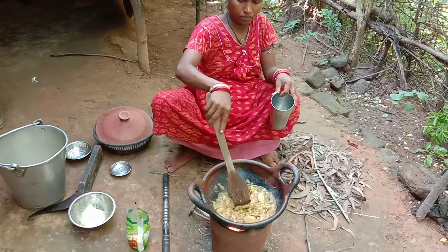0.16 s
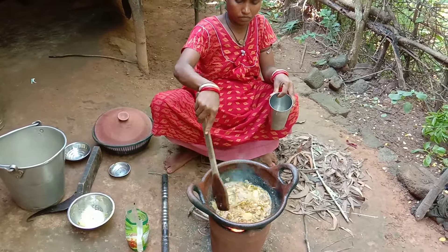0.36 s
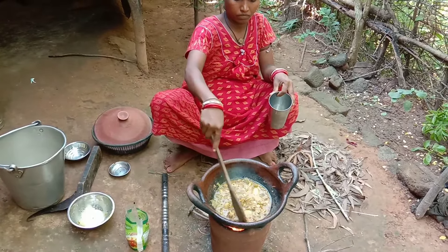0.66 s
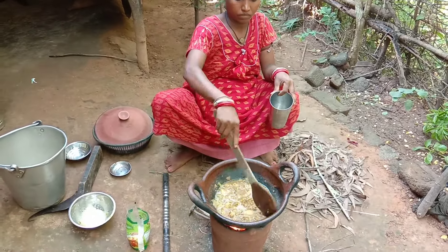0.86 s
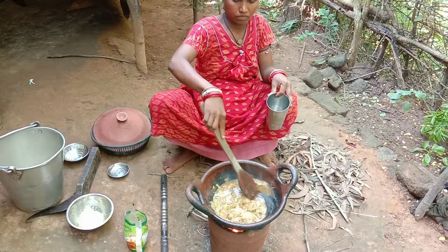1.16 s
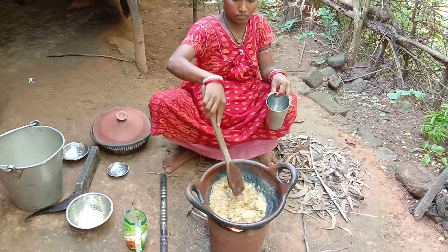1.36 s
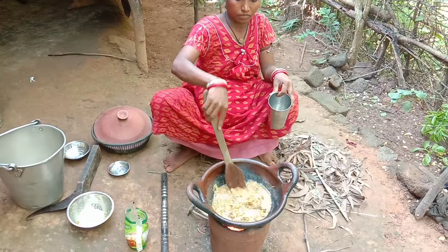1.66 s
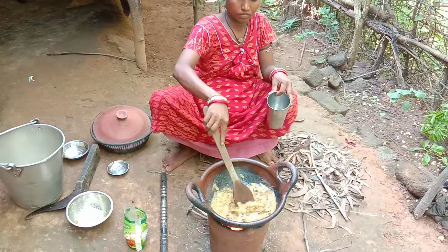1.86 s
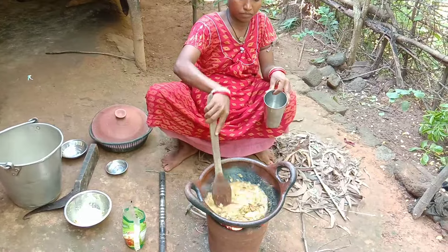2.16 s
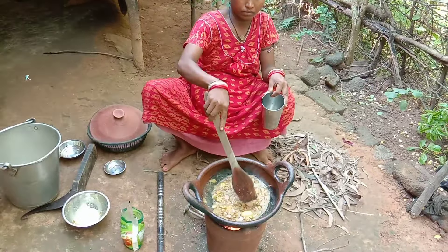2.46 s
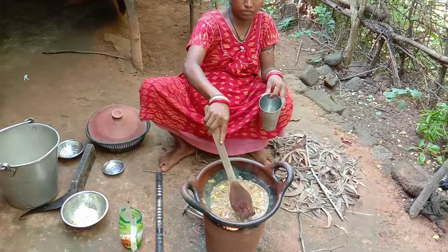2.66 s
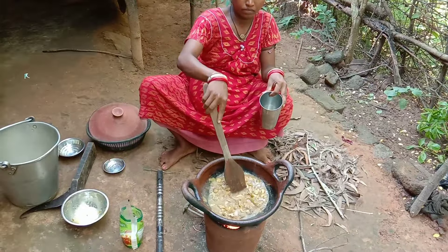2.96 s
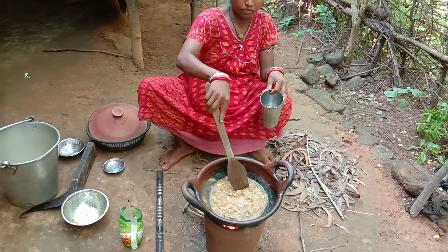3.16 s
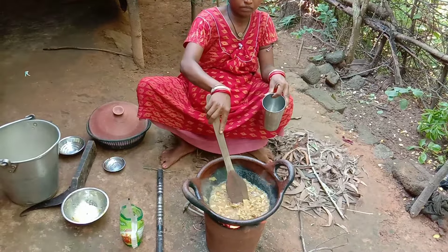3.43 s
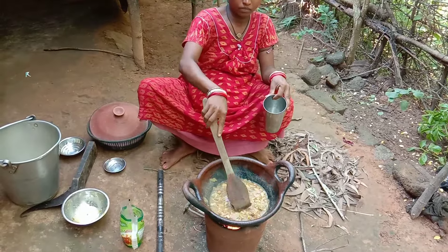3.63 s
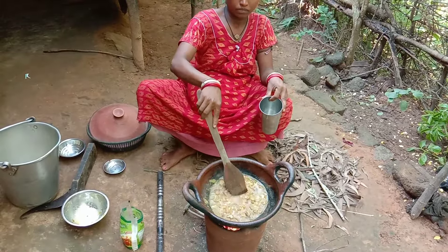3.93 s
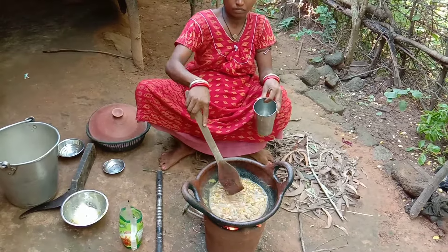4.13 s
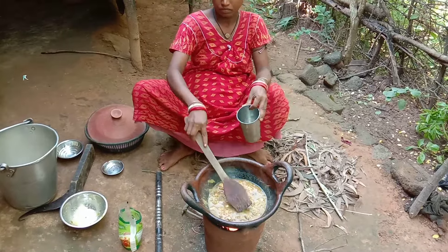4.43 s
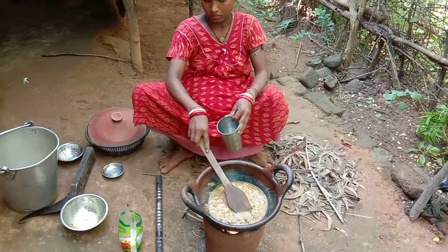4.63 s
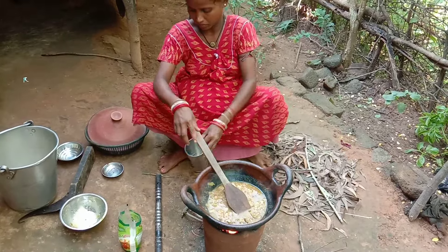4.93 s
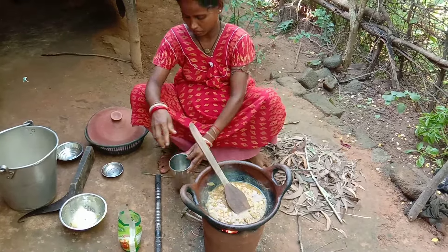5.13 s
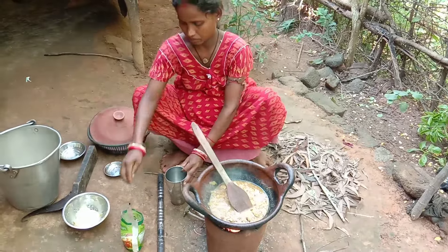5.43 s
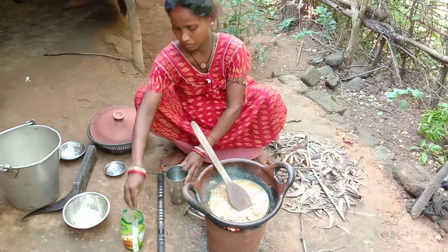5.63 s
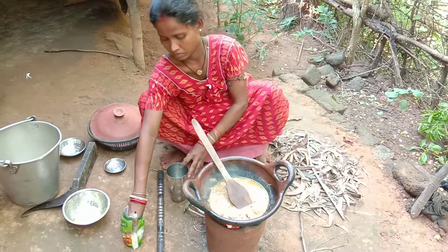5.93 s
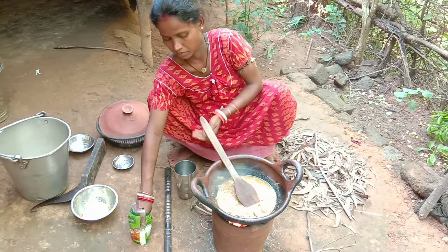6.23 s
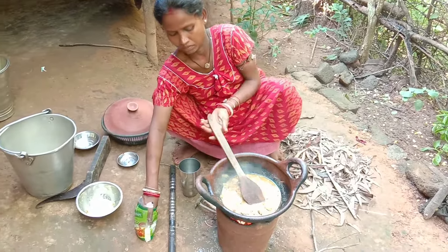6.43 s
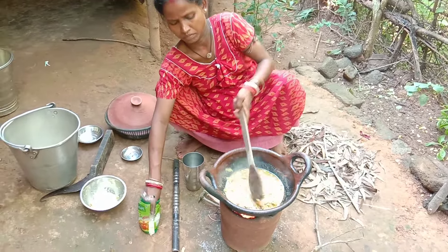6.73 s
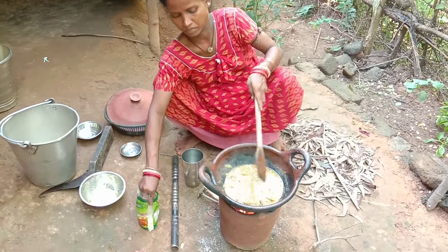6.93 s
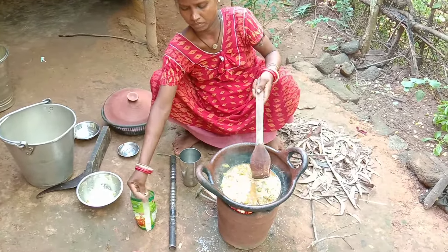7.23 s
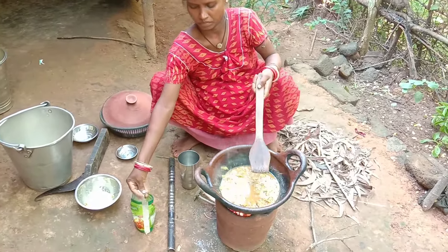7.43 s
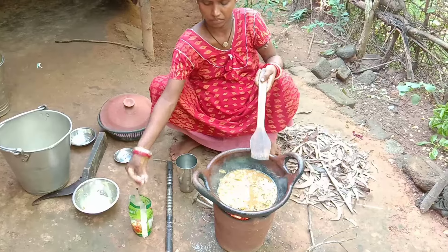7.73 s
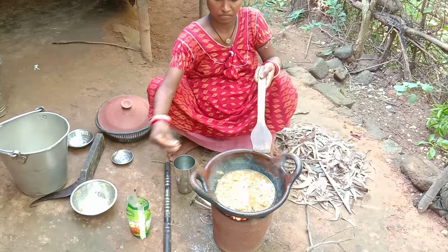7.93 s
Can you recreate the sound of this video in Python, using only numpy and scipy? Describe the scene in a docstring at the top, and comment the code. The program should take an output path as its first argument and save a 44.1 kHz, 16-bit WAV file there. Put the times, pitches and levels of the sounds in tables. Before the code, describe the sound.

Gritty wooden scraping and hollow knocks on an earthen cooking pot, with quavering goat bleats, distant answering cries and faint bird notes outdoors.

```python
"""Still air and a low drone come first, and almost at once a wooden spatula scrapes and knocks a clay pot.
It stirs food over a small fire in a village yard: gritty slips rasp, resonances sing and blows ring.
Goats bleat near and far, as pulses and hiss shaped by throat resonances.
Bangles clink on the cook's wrist as short high rings, and faint gliding notes are birds in the trees."""
import sys
import numpy as np
from scipy import signal
from scipy.fft import rfft, irfft, next_fast_len
from scipy.io import wavfile
from scipy.ndimage import uniform_filter1d

SR = 44100
rng = np.random.default_rng(int(sys.argv[2]) if len(sys.argv) > 2 else 0)


def bounce(signal):
    """Save signal as a 16-bit WAV file at the path given by the first command-line argument."""
    frames = np.transpose(np.atleast_2d(signal))
    limited = np.clip(frames, -1, 1)
    pcm = np.round(limited * 32767).astype(np.int16)
    wavfile.write(sys.argv[1], SR, pcm)


N = 356351
T = np.arange(N) / SR  # time in seconds
HZ = np.fft.rfftfreq(4096, 1 / SR)  # frequencies at which every filter is drawn


def amp(db):
    """Decibels to gain."""
    return 10 ** (np.asarray(db) / 20)


def unit(x):
    """Scales to rms 1."""
    return x / np.sqrt(np.mean(x ** 2) + 1e-20)


def read(points, hz):
    """Reads a spectrum on a log-frequency axis."""
    f, value = np.transpose(points)
    return np.interp(np.log(hz + 1), np.log(f + 1), value)


def tilt(db_per_octave):
    """Gain that changes by the same number of decibels in each octave."""
    return amp(db_per_octave * np.log2(HZ + 1))


def level(rows, axis=1, fade_db=600):
    """Gain from one dB column of a curve, fading by fade_db a second outside it."""
    rows = np.array(rows)
    outside_s = abs(T - np.clip(T, rows[0, 0], rows[-1, 0]))
    return amp(np.interp(T, rows[:, 0], rows[:, axis]) - np.minimum(fade_db * outside_s, 200))


def add(mix, s, sound):
    """Mixes a sound in at time s."""
    part = mix[max(round(s * SR), 0):][:len(sound)]
    part += sound[:len(part)]


def hold(t, length, attack_s, release_s):
    """Smooth attack, hold and release."""
    attack = np.sin(np.pi / 2 * np.clip(t / attack_s, 0, 1)) ** 2
    release = np.sin(np.pi / 2 * np.clip((length - t) / release_s, 0, 1)) ** 2
    return attack * release


def wander(hz, count=N):
    """Slow random motion of rms 1, mostly below the rate hz."""
    padded = next_fast_len(count)
    spectrum = rfft(rng.standard_normal(padded))
    smooth = np.exp(-(np.fft.rfftfreq(padded, 1 / SR) / hz) ** 2)
    return unit(irfft(spectrum * smooth, padded)[:count])


def resonances(modes):
    """Gain over frequency of a few steep-sided resonances, with the deep bass taken away."""
    peaks = sum(amp(db) / (1 + ((HZ - hz) / width) ** 2) for hz, width, db in modes)
    return peaks * HZ ** 2 / (HZ ** 2 + (modes[0][0] / 2) ** 2)


def shifted(gain, spread):
    """The same filter moved up or down in pitch by a random share."""
    return np.interp(HZ * (1 + spread * rng.standard_normal()), HZ, gain)


def colour(x, gain):
    """Causal filter with the given gain over frequency."""
    log_gain = np.log(np.maximum(np.r_[gain, gain[-2:0:-1]], 1e-5 * gain.max()))
    taps = np.fft.ifft(np.exp(np.conj(signal.hilbert(log_gain)))).real
    return signal.oaconvolve(x, taps)[:len(x)]


def grains(per_s, spread_db):
    """Random clicks, a few much larger than the rest."""
    clicks = rng.choice([-1, 1], N) * (rng.random(N) < per_s / SR)
    sizes = amp(spread_db * np.minimum(rng.exponential(1, N), 4))
    return unit(clicks * sizes)


def ring(modes, scatter_db):
    """Dying modes; every blow lands on another spot and weights them anew."""
    t = np.arange(SR // 4) / SR
    out = np.zeros(len(t))
    for k, (hz, db, t60) in enumerate(modes):
        decay = amp(db + scatter_db * rng.standard_normal() - 60 * t / t60)
        out += (-1) ** k * decay * np.sin(2 * np.pi * hz * t)
    return out


def glides(rows, buzz, rate_hz):
    """Short swelling tones that slide in pitch and flutter by the share buzz, mostly below rate_hz."""
    out = np.zeros(N)
    for s, length, start_hz, end_hz, db in rows:
        hz = np.geomspace(start_hz, end_hz, int(length * SR))
        hz = hz * (1 + buzz * wander(rate_hz, len(hz)))
        tone = np.sqrt(2) * np.sin(2 * np.pi * np.cumsum(hz) / SR)
        add(out, s, amp(db) * np.hanning(len(hz)) * tone)
    return out


def folds(hz, rough, jitter, half=1):
    """Vocal folds: uneven pulses, odd harmonics weighted by half, with a hissing puff in every cycle."""
    turns = np.cumsum(hz * (1 + jitter * wander(160, len(hz)))) / SR
    pulses = np.zeros(len(hz))
    for k in range(1, int(9000 / hz.mean())):
        pulses += (half if k % 2 else 1) * np.cos(2 * np.pi * k * turns)
    puffs = (2.0 + np.exp(-(turns % 1) / 0.71)) * rng.standard_normal(len(hz))
    hiss = signal.lfilter(*signal.butter(1, 2000, "high", fs=SR), puffs)
    rough = np.clip(rough, 0, 1)
    shimmer = amp(6 * rough * wander(110, len(hz)))
    return shimmer * (np.sqrt(1 - rough) * unit(pulses) + np.sqrt(rough) * unit(hiss))


def steadied(voice):
    """Holds a voice near rms 1 while its harmonics slide through the resonances."""
    recent_power = abs(uniform_filter1d(unit(voice) ** 2, size=2000))
    return voice / np.sqrt(recent_power + 1e-4) / np.sqrt(np.mean(voice ** 2))


# how long echoes last in the yard: pitch_hz, time to fall 60 dB t60_s
YARD_DECAY = [(200, .3), (1000, .24), (4000, .32), (12000, .16)]


def yard(x, wet_db):
    """Scattered echoes from mud walls and trees, the highest treble dying fastest."""
    t = np.arange(SR // 2) / SR
    taps = rng.standard_normal(len(t)) * (rng.random(len(t)) < 2500 / SR) * (t > .004)
    hz, s, z = signal.stft(taps, SR, nperseg=256)
    tail = signal.istft(z * amp(-60 * s / read(YARD_DECAY, hz)[:, None]), SR, nperseg=256)[1]
    echoes = signal.fftconvolve(x, tail / np.linalg.norm(tail))[:N]
    return (x + amp(wet_db) * echoes) / np.sqrt(1 + amp(2 * wet_db))


# colour of the still air: pitch_hz, relative density_db
AIR_COLOUR = [(25, -19), (45, -20), (100, -20), (220, -10.5), (400, -13), (540, -10.5), (715, -8),
              (950, -19), (1270, -8.5), (1500, -16), (3000, -19.5), (5500, -22.5), (8200, -30.5),
              (10300, -31), (12500, -33.5), (15700, -26)]


def still_air():
    """Random noise shaped to the colour of the air, at rms 1."""
    return unit(colour(rng.standard_normal(N), amp(read(AIR_COLOUR, HZ))))


# resonances of the low drone: pitch_hz, width_hz, relative level_db
DRONE_MODES = [(59.5, 7.7, -10.5), (88.9, 6.3, 4.5), (122.3, 11, -7), (164, 86, -11)]
# strength of the drone over time, before its waver: time_s, level_db
DRONE_CURVE = [(0, -67), (1.4, -63.5), (1.7, -67.5), (1.9, -56.5), (2.8, -59.5), (3.9, -65), (5.5, -63.5),
               (8.08, -64.5)]
# resonance of the thin high hiss: pitch_hz, width_hz, relative level_db
HISS_MODES = [(10730, 230, 0)]
AIR_DB, AIR_SWELL_DB, AIR_SWELL_HZ = -68.5, 1.2, 3.5
DRONE_WAVER_DB, DRONE_WAVER_HZ = 3, 9
HISS_DB = -76.5


def background():
    """Still air, a low wavering drone and a thin high hiss, all made of filtered noise."""
    air = still_air() * amp(AIR_DB + AIR_SWELL_DB * wander(AIR_SWELL_HZ))
    drone = unit(colour(rng.standard_normal(N), resonances(DRONE_MODES))) * level(DRONE_CURVE)
    drone = drone * amp(DRONE_WAVER_DB * wander(DRONE_WAVER_HZ))
    hiss = amp(HISS_DB) * unit(colour(rng.standard_normal(N), resonances(HISS_MODES)))
    return air + drone + hiss


# bird notes: start_s, length_s, start_pitch_hz, end_pitch_hz, level_db
BIRD_NOTES = [(0, 0.35, 602, 574, -66), (3.12, 0.19, 5360, 4673, -66), (3.18, 0.09, 3950, 3600, -61),
              (3.305, 0.075, 4100, 3600, -60), (3.3, .16, 5500, 4600, -67), (3.48, 0.14, 6000, 4200, -61),
              (3.55, 0.09, 4300, 3400, -63), (3.6, .14, 5500, 4700, -67), (3.715, 0.08, 4650, 3900, -68),
              (3.775, 0.07, 5350, 5300, -67), (3.86, .16, 5400, 4900, -70), (3.95, .1, 4100, 3600, -68),
              (4.542, .08, 5700, 4730, -68), (4.78, 0.1, 5300, 4530, -68), (5.036, .14, 6570, 4870, -71),
              (8.02, 0.11, 3890, 3590, -58)]


def birds():
    """Faint gliding notes that echo among the trees."""
    return yard(glides(BIRD_NOTES, buzz=0.045, rate_hz=294), wet_db=6)


# clear far cries: start_s, length_s, pitch_hz, start above that pitch (share), final drop (share),
# waver (share), level_db, middle swell_db, then relative level_db of harmonics 1, 2 and 3
CLEAR_CALLS = [(3.25, .6, 492, .085, .025, .007, -62, 6, -14, 0, -19),
               (3.755, .1, 770, -.03, -.01, .028, -52.5, 5, 0, -22, -19)]
SETTLE_S = .055  # a clear cry slides onto its note
CLEAR_WAVER_DB, CLEAR_WAVER_HZ = 2.5, 14  # its strength wavers on the way


def clear_cries():
    """Thin, nearly pure calls from far off: three harmonics slide onto a note and swell."""
    out = np.zeros(N)
    for s, length, hz, scoop, drop, waver, db, swell_db, *harmonics_db in CLEAR_CALLS:
        t = np.arange(int(length * SR)) / SR
        glide = 1 + scoop * np.exp(-t / SETTLE_S) - drop * (t / length) ** 2
        pitch = hz * glide * (1 + waver * wander(60, len(t)))
        turns = np.cumsum(pitch) / SR
        tone = sum(amp(part_db) * np.sin(2 * np.pi * k * turns)
                   for k, part_db in enumerate(harmonics_db, 1))
        swell = swell_db * np.sin(np.pi * t / length)
        effort = amp(db + swell + CLEAR_WAVER_DB * wander(CLEAR_WAVER_HZ, len(t)))
        add(out, s, effort * unit(tone) * hold(t, length, .015, .03))
    return yard(out, wet_db=-7)


# far bleats: start_s, length_s, starting pitch_hz, final drop (share), level_db before FAR_DB,
# swell_db from start to end, roughness (0-1), brightness (dB an octave from 1 to 2 kHz)
FAR_BLEATS = [(4.02, .24, 468, .04, -54.5, -4, .3, 3), (4.09, .17, 415, .06, -55, 0, .45, -4),
              (4.235, .41, 490, .17, -50.5, -3, .13, 1), (4.43, .22, 420, .03, -54.5, -6, .35, 12),
              (4.67, .3, 478, 0, -54, -2, .28, 12), (4.9, .19, 432, 0, -50.5, -3, .14, 11),
              (4.99, .38, 478, 0, -53, 0, .4, 13), (5.05, .32, 428, .3, -50, 0, .25, 8),
              (5.59, 0.23, 358, 0.022, -57.5, 8, 0.15, 6)]
# throat of the far goats: pitch_hz, width_hz, relative level_db
FAR_THROAT_MODES = [(470, 120, -48), (740, 52, 12), (922, 60, 10), (1270, 37, -8), (1705, 98, 1),
                    (1865, 65, 5.5), (2586, 53, -9.5), (2786, 53, -8), (3120, 72, -21.5), (3570, 113, -16)]
FAR_DB = -0.5  # the far goats together
FAR_SAG_PER_S, FAR_DROP_POWER = .12, 2.4  # the pitch sinks steadily, then gives way at the end
FAR_ATTACK_S, FAR_RELEASE_S = 0.041, 0.051
FAR_WOBBLE, FAR_WOBBLE_HZ, FAR_FLUTTER_DB = .038, 30, 5  # scaled by the root of the roughness


def far_goats():
    """Answering calls, dull and blurred by distance; hoarse ones have lines between their harmonics."""
    out = np.zeros(N)
    for s, length, hz, drop, db, swell_db, rough, bright_db in FAR_BLEATS:
        t = np.arange(int(length * SR)) / SR
        unrest = np.sqrt(abs(rough))
        sinking = 1 - FAR_SAG_PER_S * t - drop * (t / length) ** FAR_DROP_POWER
        pitch = hz * sinking * (1 + FAR_WOBBLE * unrest * wander(FAR_WOBBLE_HZ, len(t)))
        # pulses at half the pitch: their odd harmonics are the lines in between
        drive = folds(pitch / 2, rough, jitter=.05 * rough, half=.4 * rough)
        brightness = amp(bright_db * np.clip(np.log2((HZ + 1) / 1000), 0, 1))
        voice = steadied(colour(drive, resonances(FAR_THROAT_MODES) * brightness))
        effort = amp(FAR_DB + db + swell_db * (t / length - .5))
        effort = effort * hold(t, length, FAR_ATTACK_S, FAR_RELEASE_S)
        flutter = amp(FAR_FLUTTER_DB * unrest * wander(FAR_WOBBLE_HZ, len(t)))
        add(out, s, effort * unit(flutter) * voice)
    return yard(out, wet_db=-4)


# path of the long near bleat: time_s, pitch_hz, effort level_db before LONG_DB
LONG_BLEAT = [(2.47, 220, -49), (2.5, 235, -40), (2.522, 224, -38.5), (2.545, 239, -37.5),
              (2.57, 231, -38.5), (2.597, 239, -37.5), (2.622, 223, -37), (2.657, 236, -36.5),
              (2.695, 213, -35.5), (2.725, 234, -35.5), (2.752, 233, -36), (2.78, 223, -36),
              (2.81, 226, -37), (2.84, 219, -36), (2.872, 226, -37), (2.915, 201, -41.5), (2.955, 214, -38),
              (2.99, 200, -43), (3.035, 198, -50)]
# how far its mouth is open: time_s, opening (0-1)
MOUTH_OPENING = [(2.48, 0.2), (2.53, 0.56), (2.62, 0.85), (2.75, 0.93), (2.97, 1), (3.04, 1)]
# throat with the mouth open: pitch_hz, width_hz, relative level_db
OPEN_THROAT_MODES = [(230, 80, -12.5), (503, 17.4, 12), (870, 64, 11), (1233, 75, -6), (2116, 107, 3),
                     (3290, 130, -0.5), (3830, 210, -2.5), (4920, 220, -6.5), (5590, 89, -6.5),
                     (7160, 110, -19), (11900, 1100, -59)]
# throat with the mouth half shut: pitch_hz, width_hz, relative level_db
HALF_SHUT_MODES = [(233, 60, -24), (494, 104, 5), (715.5, 69, -8), (1280, 100, 1), (2020, 130, 7),
                   (3320, 140, 3), (3570, 277, -8), (5270, 1400, -9)]
LONG_DB = -2  # the whole bleat


def long_goat():
    """A cry that trembles in pitch as it sinks, clear below and hoarse above; the mouth starts half shut."""
    s, hz, _ = np.transpose(LONG_BLEAT)
    pitch = uniform_filter1d(np.interp(T, s, hz), size=500)
    sounding = abs(T - np.clip(T, s[0], s[-1])) < .05
    drive = np.zeros(N)
    drive[sounding] = folds(pitch[sounding], rough=.22, jitter=.013)
    mouth = np.clip(np.interp(T, *np.transpose(MOUTH_OPENING)), 0, 1)
    open_voice = unit(colour(drive, resonances(OPEN_THROAT_MODES)))
    shut_voice = unit(colour(drive, resonances(HALF_SHUT_MODES)))
    voice = steadied(mouth * open_voice + (1 - mouth) * shut_voice)
    return yard(voice * level(LONG_BLEAT, axis=2) * amp(LONG_DB), wet_db=-9)


# throbs of the two quavering bleats: middle time_s, top pitch_hz, level_db,
# narrowness of the mouth (0-1), brightness (dB an octave)
BLEAT_THROBS = [(1.781, 398.6, -37.5, 0.02, 1), (1.89, 391.8, -36.5, 0.03, 0.5),
                (2.005, 371.6, -40, 0.03, 1.5), (2.12, 379.5, -49, 0, 0), (7.03, 394.3, -40.5, 0.33, 1.5),
                (7.14, 384.6, -38, 0.04, 1), (7.25, 380, -40.5, 0.01, -0.5), (7.365, 366, -40.5, 0.01, 0.5),
                (7.48, 362, -40.5, 0, 0.5), (7.6, 360.7, -41, 0.01, -0.5), (7.729, 344, -45.5, 0, -1),
                (7.843, 347, -43.5, 0.04, -1), (7.95, 375, -57, 0.18, -6.5)]
# throat of the quavering goat: pitch_hz, width_hz, relative level_db
QUAVER_MODES = [(303, 13, 1), (764, 140, -3.5), (1083, 180, 2.5), (1803, 39, 4), (2375, 51, -0.5),
                (3460, 172, 4), (4210, 280, 6), (4860, 210, 2), (5520, 210, 1.5), (7100, 94, -14)]
# low resonance that a narrow mouth adds: pitch_hz, width_hz, relative level_db
NARROW_MODES = [(720, 82, 24)]
THROB_WIDTH_S, BETWEEN_DB = .021, -13.5  # BETWEEN_DB is the voice left between throbs
ARCH_SHARE, ARCH_S, ARCH_LATE_S = .14, .03, .007  # the pitch arches up to a top just after the middle
THROB_VARIETY = .25  # throbs differ in length and swoop by up to this share
THROAT_SHIFT = 0.034  # the mouth shapes every throb a little differently
THROAT_TOP_HZ = 6500  # the throat passes little above this
TOP_SPLIT_HZ, TOP_LEAD_S = 4650, .011  # the top opens first, so each throb sweeps down in colour


def quavering_goat():
    """Calls throb about nine times a second, sinking and fading; each throb is a hoarse arching swoop."""
    out, t = np.zeros(N), np.arange(-SR // 12, SR // 12) / SR
    top = 1 - 1 / (1 + (HZ / TOP_SPLIT_HZ) ** 16)
    for s, hz, db, narrow, bright_db in BLEAT_THROBS:
        stretch, swoop = 1 + THROB_VARIETY * rng.uniform(-0.99, 1, 2)
        arch = 1 - swoop * ARCH_SHARE * (1 - np.exp(-.5 * ((t - ARCH_LATE_S) / ARCH_S) ** 2))
        drive = folds(hz * arch * (1 + .012 * wander(35, len(t))), rough=.44, jitter=.028)
        throat = resonances(QUAVER_MODES) + np.clip(narrow, 0, 1) * resonances(NARROW_MODES)
        throat = shifted(throat, THROAT_SHIFT) / np.hypot(1, (HZ / THROAT_TOP_HZ) ** 6)
        voice = unit(colour(drive, throat * tilt(bright_db)))
        for band, lead_s in [(1 - top, 0), (top, TOP_LEAD_S)]:
            push = np.exp(-.5 * ((t + lead_s) / (stretch * THROB_WIDTH_S)) ** 2)
            push = push + amp(BETWEEN_DB) * np.hanning(len(t))
            add(out, s + t[0], amp(db) * push * colour(voice, np.sqrt(band)))
    return yard(out, wet_db=-5.5)


# taps of the bangles: start_s, relative level_db, brightness (dB an octave)
BANGLE_TAPS = [(3.286, -48.5, 0), (3.345, -60, -18), (3.694, -55.5, -7), (4.054, -60.5, -16),
               (4.205, -63, 0), (4.429, -48.5, -3.5), (5.327, -44, 4.5), (5.342, -53, -12)]
# ring of a bangle: pitch_hz, relative level_db, time to fall 60 dB t60_s
BANGLE_MODES = [(5020, -12, .04), (5380, -12, .04), (7020, -3.5, 0.057), (7300, -8, .04),
                (9420, -1.5, 0.049), (9740, -8, 0.032), (9950, -7, .035), (11000, -1, 0.041),
                (13100, -28, 0.055), (15470, -9, .07)]
BANGLE_MIDDLE_HZ = 9000  # brightness turns about this pitch


def bangles():
    """Thin rings tapping each other: a tick with a high ring, brighter for a sharp tap."""
    out = np.zeros(N)
    for s, db, tilt_db in BANGLE_TAPS:
        modes = [(hz, mode_db + tilt_db * np.log2(hz / BANGLE_MIDDLE_HZ), t60)
                 for hz, mode_db, t60 in BANGLE_MODES]
        tone = ring(modes, scatter_db=1.5)
        tick = .8 * rng.standard_normal(len(tone)) * np.exp(-T[:len(tone)] / .004)
        add(out, s, amp(db) * (tone + tick))
    return yard(out, wet_db=-13.0)


# blows of the spatula on the pot: start_s, relative level_db, softness as the corner_hz of the blow
POT_BLOWS = [(0.444, -37, 700), (0.573, -44, 600), (0.717, -37, 600), (0.761, -33.5, 1201),
             (0.771, -32, 880), (0.899, -37, 1280), (.908, -30, 760), (1.004, -50, 610),
             (2.709, -31.5, 2080), (4.052, -48.5, 790), (4.631, -54, 500), (5.761, -41, 2430),
             (5.818, -39, 7040), (5.855, -34.5, 6000), (5.915, -34.5, 3980), (5.966, -36.5, 7000),
             (6.035, -34, 7100), (6.076, -34.5, 7500), (6.195, -38, 7000), (6.3204, -44, 7002),
             (6.4517, -15.5, 1980), (6.4874, -37.5, 8030), (6.5153, -43.5, 7000), (6.685, -42, 7140),
             (6.845, -40, 7040), (7.135, -40.5, 6000), (7.195, -38.5, 6000)]
# ring of the pot: pitch_hz, relative level_db, time to fall 60 dB t60_s
POT_MODES = [(275, 0.5, 0.033), (331.6, 3, 0.059), (459, 2, 0.093), (582, -16, 0.16), (745, -6.5, 0.057),
             (912, -4, 0.054), (1000, -0.5, 0.022), (1293, -3, 0.039), (1624, -18.5, 0.086),
             (2258, 1, 0.031), (2840, -17, 0.0093), (2950, -14, 0.058), (3340, -0.5, 0.018),
             (3730, -2.5, 0.04), (4830, 6, 0.0089), (5060, -15, .035), (5330, 5, 0.0076)]
# colour of grit and of the crack of a blow: pitch_hz, relative level_db
GRIT_COLOUR = [(250, -22), (600, 4), (1100, 1.5), (1900, 0), (2800, 1.5), (3700, 3), (4300, -0.5),
               (5400, 5), (6100, -1), (7000, 0), (8000, -17), (9800, -10.5), (13000, -20.5), (15500, -14)]
REBOUND_S, REBOUND_DB = 0.02, -12  # the blade bounces once


def knocks(crack_db=3, crack_s=0.011):
    """Each blow cracks and rings the pot, then bounces; food cushions the softer ones."""
    out = np.zeros(N)
    for s, db, corner_hz in POT_BLOWS:
        # a brief blow carries little bass, a cushioned one little treble
        blow = HZ / np.hypot(HZ, 0.28 * corner_hz) / np.sqrt(1 + (HZ / corner_hz) ** 3)
        for delay_s, softer_db in [(0, 0), (REBOUND_S, REBOUND_DB)]:
            body = ring(POT_MODES, scatter_db=.7)
            crack = unit(colour(rng.standard_normal(len(body)), amp(read(GRIT_COLOUR, HZ))))
            crack = crack * np.exp(-T[:len(body)] / crack_s)
            # 3 dB down for all knocks together
            add(out, s + delay_s, amp(db + softer_db - 3) * colour(body + amp(crack_db) * crack, blow))
    return yard(out, wet_db=-27.0)


# thick food plops: start_s, length_s, start_pitch_hz, end_pitch_hz, level_db
FOOD_PLOPS = [(1.52, 0.07, 311.8, 337.8, -65), (2.365, 0.071, 329, 287, -44), (4.615, 0.042, 419, 424, -55),
              (6.94, 0.065, 461, 376, -55), (7.42, 0.074, 422, 394, -52.5), (7.5, 0.047, 404, 366, -56.5),
              (7.645, 0.028, 250, 305, -57.5)]


def plops():
    """Thick food plops: short low tones whose pitch slides and flutters."""
    return glides(FOOD_PLOPS, buzz=0.16, rate_hz=1070)


# the blade squeaks and hisses on the wall: start_s, length_s, start_pitch_hz, end_pitch_hz,
# level_db before its swell, width_hz
BLADE_SQUEAKS = [(0.374, 0.12, 1960, 1890, -56.5, 150), (.38, .08, 3000, 2900, -65, 200),
                 (.59, 0.13, 6700, 5860, -54, 700), (0.611, 0.085, 4500, 4200, -58, 600),
                 (.68, .23, 5800, 5500, -49.5, 330), (0.731, 0.15, 3900, 3700, -53, 300),
                 (.85, 0.18, 5550, 5400, -57, 300), (1.267, .17, 1255, 1260, -52, 35),
                 (1.388, .11, 1245, 1264, -46, 24.6), (1.246, 0.15, 1970, 2020, -57.5, 90),
                 (1.386, 0.075, 2050, 2090, -55.5, 90), (1.388, .09, 2530, 2570, -58, 80),
                 (3.12, 0.078, 1290, 1290, -66.5, 60), (3.121, 0.07, 2020, 2000, -69, 70),
                 (3.24, 0.093, 1270, 1240, -57.5, 45), (3.28, .32, 720, 677, -62.5, 40),
                 (4.17, .16, 1260, 1235, -55.5, 45), (4.801, .12, 1265, 1247, -52.5, 29.7),
                 (4.899, 0.11, 1250, 1240, -53.5, 35), (5.091, 0.26, 1260, 1285, -53, 45)]


def squeaks():
    """Stick and slip feeds one resonance, which swells and slides as the blade travels."""
    out = np.zeros(N)
    for s, length, start_hz, end_hz, db, width_hz in BLADE_SQUEAKS:
        count = int(length * SR)
        turn = np.exp(2j * np.pi * np.cumsum(np.geomspace(start_hz, end_hz, count)) / SR)
        band = (turn * (wander(width_hz, count) + 1j * wander(width_hz, count))).real
        add(out, s, amp(db) * unit(band) * np.hanning(count))
    return out


# middles of the bands, one for each size of grain: pitch_hz
GRAIN_MIDDLES = [900, 1700, 2600, 3500, 4500, 5600, 6900, 10000]
CLUMP_DB, CLUMP_HZ = 2.6, 38  # grains of each size come in clumps


def grit_grains():
    """Grains of every size catch under the blade, each size in its own clumps and its own band."""
    out = np.zeros(N)
    for share in np.eye(len(GRAIN_MIDDLES)):
        clumps = amp(CLUMP_DB * wander(CLUMP_HZ))
        band = np.sqrt(np.interp(HZ, GRAIN_MIDDLES, share) + 1e-4)
        out += colour(grains(800, 3.9) * clumps, band)
    return unit(out)


# strokes of the spatula: start_s, push_s, ease_s, grit level_db, singing wall level_db,
# juddering bowl level_db (levels at the hardest push), grit brightness (dB an octave), low_cut_hz
SPATULA_STROKES = [(.2, 0.059, 0.065, -69, -83, -84, 0, 400),
                   (0.378, 0.043, 0.087, -65, -82, -59.5, -1.5, 400),
                   (0.556, 0.21, 0.065, -49, -57.5, -40, 2, 250),
                   (0.783, 0.12, 0.089, -50.5, -66, -49.5, 3, 250),
                   (0.963, 0.033, 0.12, -60.5, -63, -48, 3.5, 252),
                   (1.068, 0.028, 0.084, -62.5, -57, -62, 1, 248.4),
                   (1.236, 0.14, 0.15, -58, -58.5, -71, 1, 617),
                   (1.928, 0.16, 0.15, -49.5, -61, -68, -2, 1190),
                   (2.032, 0.12, 0.2, -44.5, -45.5, -72, 1.5, 1190),
                   (2.187, 0.14, 0.15, -48, -63, -64.5, 4.5, 1190),
                   (2.442, 0.024, 0.44, -48.5, -52, -61.5, 3, 1203),
                   (2.82, 0.073, 0.21, -55, -55, -64.5, 2, 1200),
                   (3.099, 0.18, 0.22, -65.5, -75, -73, 5, 320),
                   (4.03, 0.018, 0.2, -65.5, -57.5, -57.5, -2, 316),
                   (4.202, 0.34, .2, -67.5, -59, -70, 6, 320),
                   (4.602, 0.685, 0.11, -67, -58.5, -82, 7, 312),
                   (5.711, 0.052, 0.044, -59, -49, -72, -0.5, 440),
                   (5.754, 0.095, 0.23, -40.5, -41, -57, 1, 450),
                   (5.977, 0.11, 0.26, -46, -46.5, -54.5, 1, 440),
                   (6.29, 0.032, 0.18, -42.5, -48.5, -57, -0.5, 440.7),
                   (6.438, 0.062, 0.089, -58, -48.5, -67, 4, 293),
                   (6.531, 0.1, 0.098, -54.5, -60, -71, -0.5, 430),
                   (6.664, 0.09, 0.14, -44, -47, -57.5, 0, 430),
                   (6.848, 0.062, 0.066, -45, -50.5, -50, 0, 430),
                   (7.088, 0.031, 0.19, -44, -50.5, -54, 0, 400)]
# singing of the pot wall: pitch_hz, width_hz, relative level_db
WALL_MODES = [(1239, 65, 4), (1970, 410, -14.5), (2760, 600, -13.5)]
# hollow sound of the bowl: pitch_hz, width_hz, relative level_db
BOWL_MODES = [(354, 76, 2.5), (472, 83, 7.5), (662, 44, 1)]
# echoes across the pot: strength (share), average delay_s
ACROSS_POT = [(.45, .0017), (.35, .0029)]
LIGHT_DB, EASED_DB = -6, -3  # pressure at the start and end of a stroke, against its hardest push
UNSTEADY_DB, UNSTEADY_HZ = 0.8, 21  # the hand presses unevenly
WALL_LAW, BOWL_LAW = 2.6, 3.2  # dB of ringing for each dB of pressure
BOWL_SHIFT = .04  # the bowl answers each stroke at a slightly different pitch
BITE_S, LIFT_S = .035, .04  # shortest fade in and out
BITE_SHARE, LIFT_SHARE = 0.14, 0.26  # slower strokes also bite and lift more slowly


def scraping():
    """Wood slips over gritty clay in uneven catches; under pressure the wall sings and the bowl judders."""
    catches = unit(amp(0.73 * wander(79)))
    slips = (grains(2500, 5.0) + grit_grains()) * catches
    # the echoes across the pot shift as the blade travels, so the rasp has moving resonances
    travel = wander(3.19)
    for echo, echo_s in ACROSS_POT:
        slips = slips + echo * np.interp(T - echo_s * (1 + .13 * travel), T, slips)
    wall = unit(colour(grains(3000, 0.67) * catches, resonances(WALL_MODES)))
    judder = grains(1200, 0.67) * np.sqrt(catches)
    hollow = resonances(BOWL_MODES) * HZ ** 4 / np.hypot(HZ ** 4, 290 ** 4)
    out, unsteady_db = np.zeros(N), UNSTEADY_DB * wander(UNSTEADY_HZ)
    for s, push_s, ease_s, grit_db, wall_db, bowl_db, tilt_db, low_hz in SPATULA_STROKES:
        length = push_s + ease_s
        span = (T >= s) & (T < s + length)
        t = T[span] - s
        press_db = np.interp(t, [0, push_s, length], [LIGHT_DB, 0, EASED_DB])
        pressure = amp(press_db + unsteady_db[span])
        low_cut = HZ ** 3 / np.hypot(HZ ** 3, low_hz ** 3)
        grit = unit(colour(slips[span], amp(read(GRIT_COLOUR, HZ)) * tilt(tilt_db) * low_cut))
        bowl = unit(colour(judder[span], shifted(hollow, BOWL_SHIFT)))
        rasp = amp(grit_db) * grit * pressure
        rasp = rasp + amp(wall_db) * wall[span] * pressure ** WALL_LAW
        rasp = rasp + amp(bowl_db) * bowl * pressure ** BOWL_LAW
        add(out, s, rasp * hold(t, length, BITE_S + BITE_SHARE * push_s, LIFT_S + LIFT_SHARE * ease_s))
    return yard(out + squeaks() + plops(), wet_db=-16)


SIDE_AIR_DB, SIDE_DB = -75.5, -44  # air that differs between the channels; scattered sound from the sides


def scene():
    """Both channels are nearly alike, apart from a trace of air and of the echoing yard."""
    goats = quavering_goat() + long_goat() + far_goats()
    mid = background() + birds() + clear_cries() + goats + bangles() + knocks() + scraping()
    side = amp(SIDE_AIR_DB) * still_air() + amp(SIDE_DB) * yard(mid, wet_db=0)
    return np.array([mid + side, mid - side])


EDGE_HZ = 15800


def record(dry):
    """Cuts the treble steeply above EDGE_HZ."""
    low_pass = signal.firwin(511, EDGE_HZ, window=("kaiser", 8), fs=SR)
    return signal.oaconvolve(dry, low_pass[None], "same")


dry = scene()
out = record(dry)
bounce(out)
```